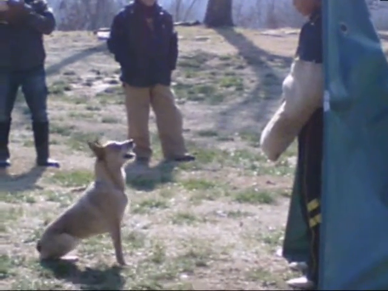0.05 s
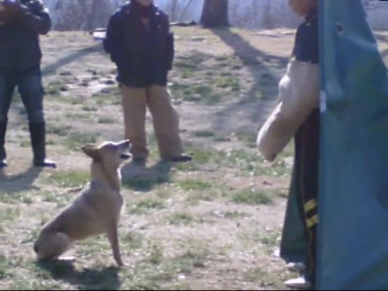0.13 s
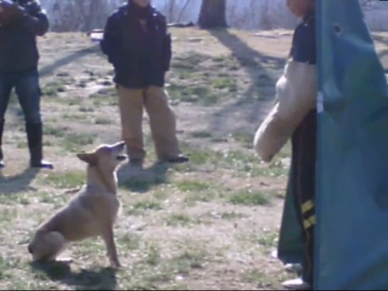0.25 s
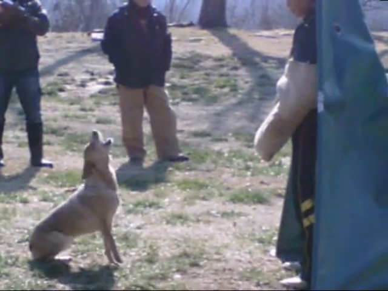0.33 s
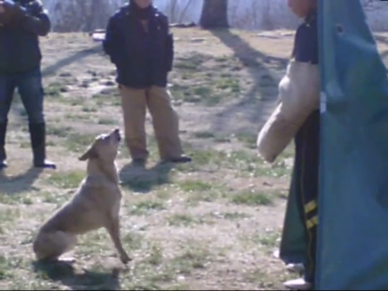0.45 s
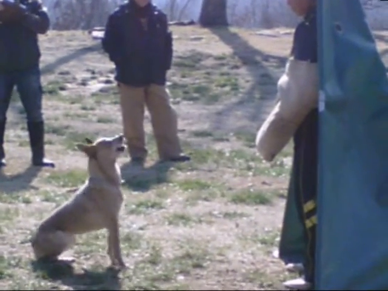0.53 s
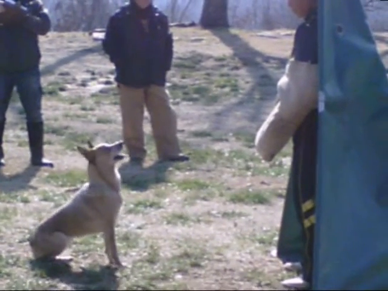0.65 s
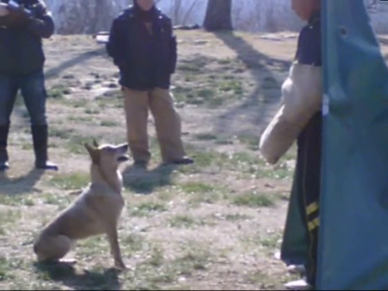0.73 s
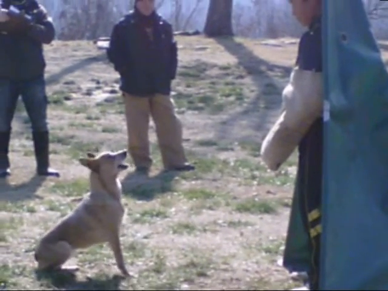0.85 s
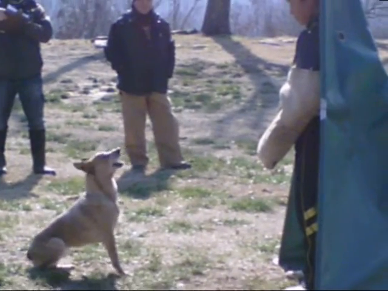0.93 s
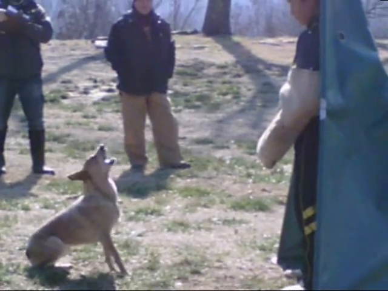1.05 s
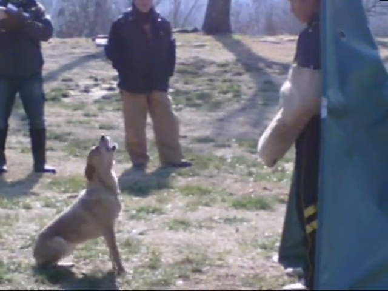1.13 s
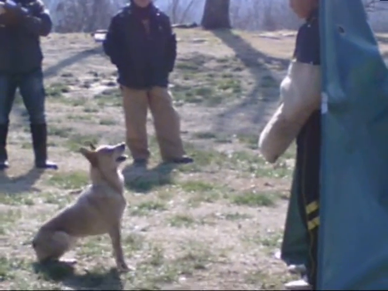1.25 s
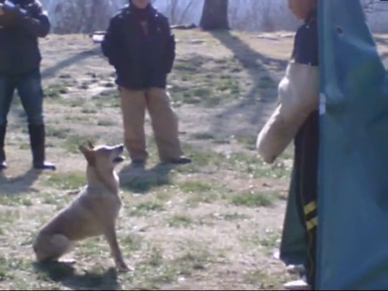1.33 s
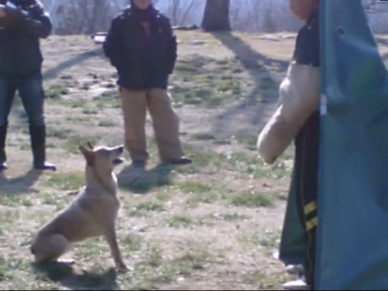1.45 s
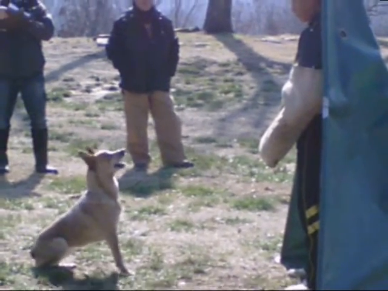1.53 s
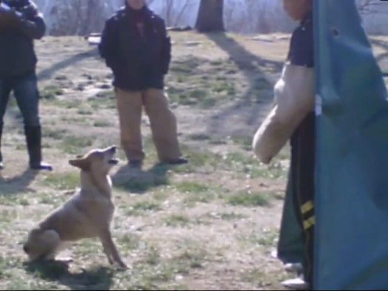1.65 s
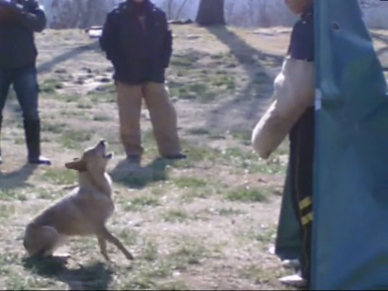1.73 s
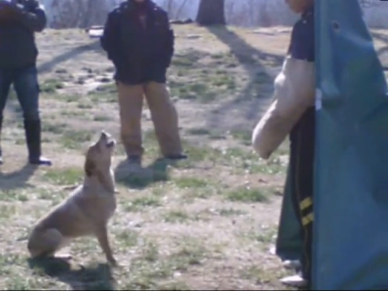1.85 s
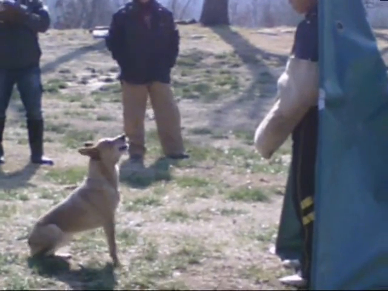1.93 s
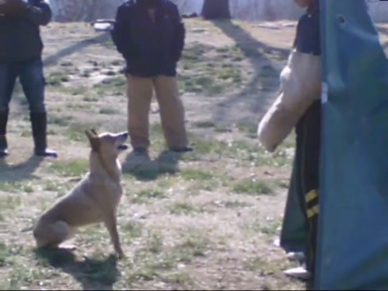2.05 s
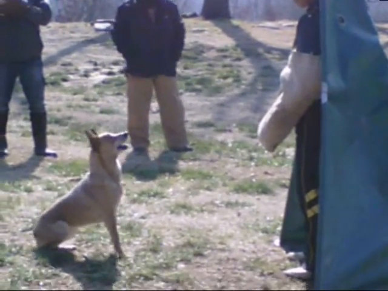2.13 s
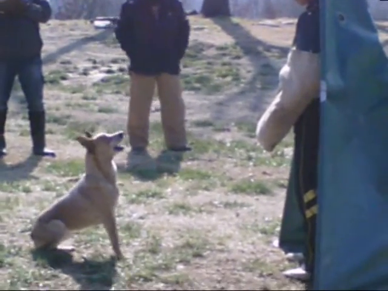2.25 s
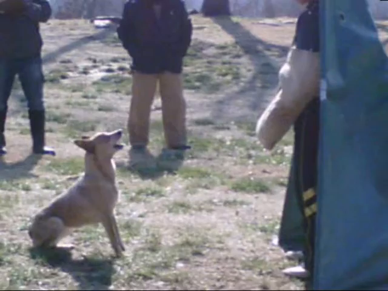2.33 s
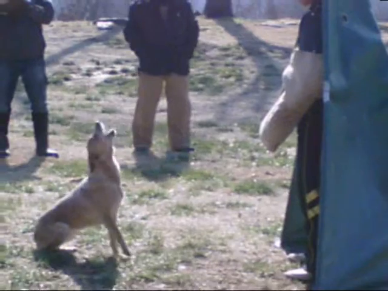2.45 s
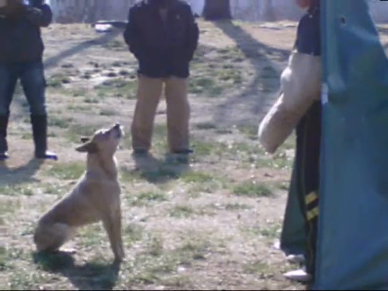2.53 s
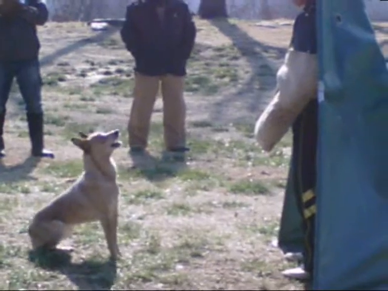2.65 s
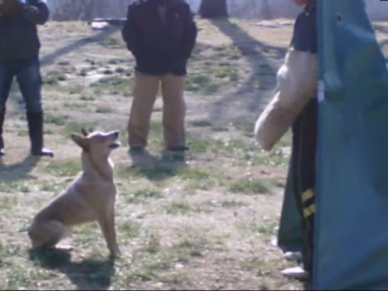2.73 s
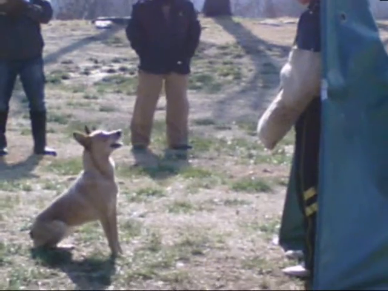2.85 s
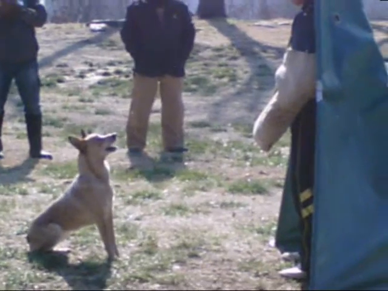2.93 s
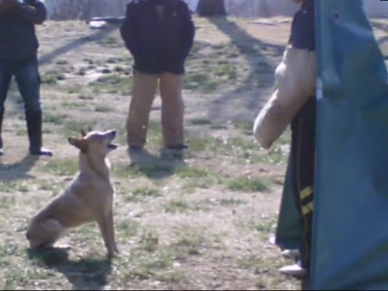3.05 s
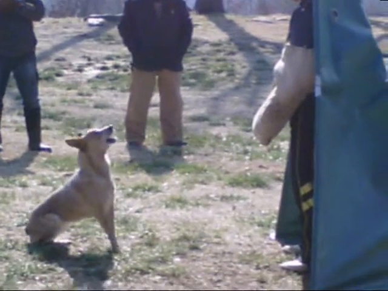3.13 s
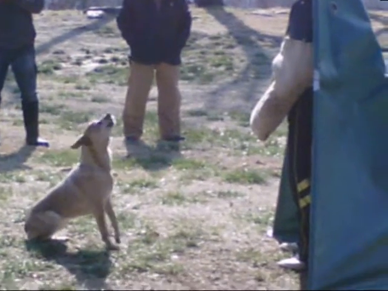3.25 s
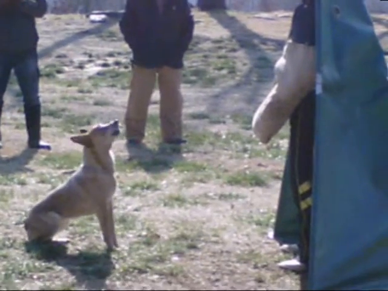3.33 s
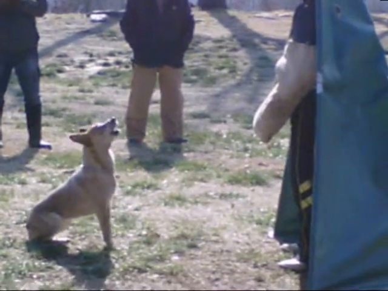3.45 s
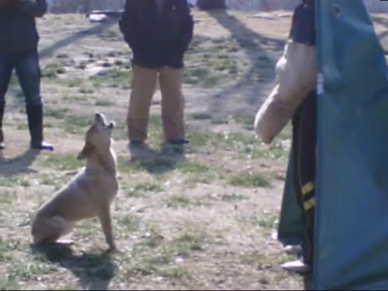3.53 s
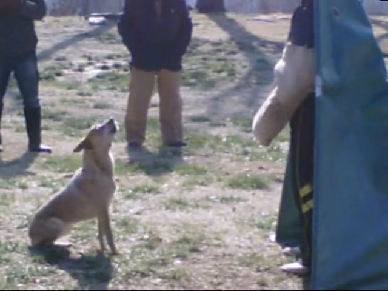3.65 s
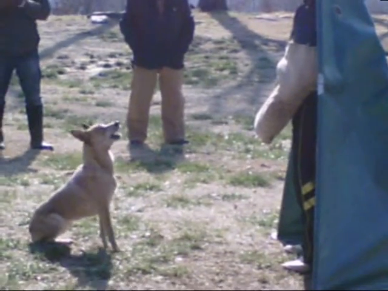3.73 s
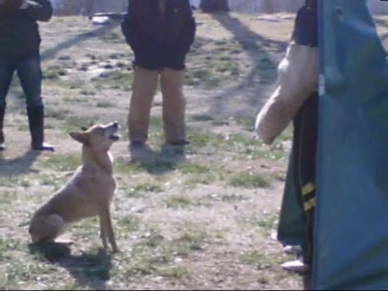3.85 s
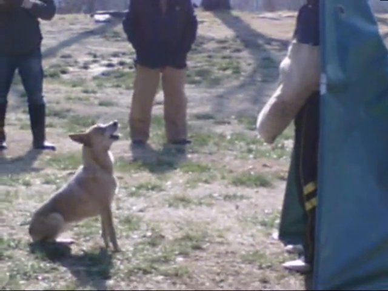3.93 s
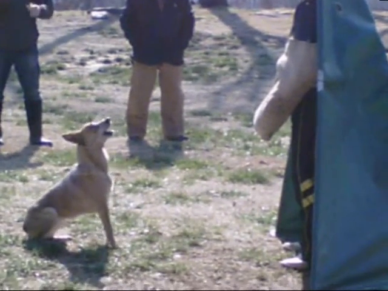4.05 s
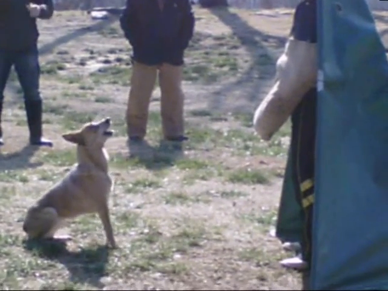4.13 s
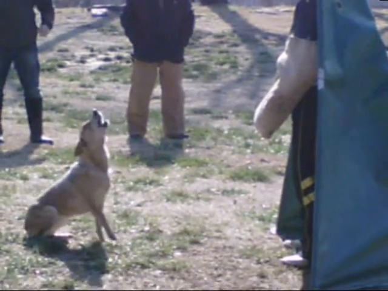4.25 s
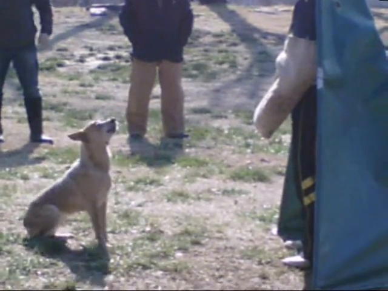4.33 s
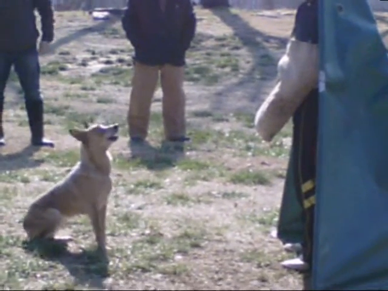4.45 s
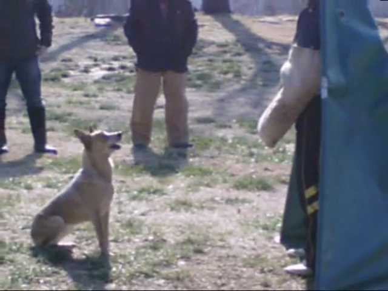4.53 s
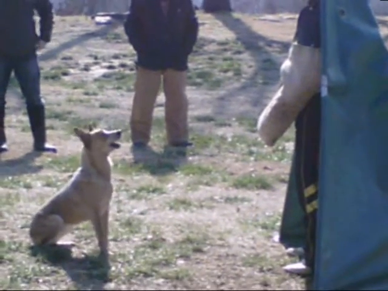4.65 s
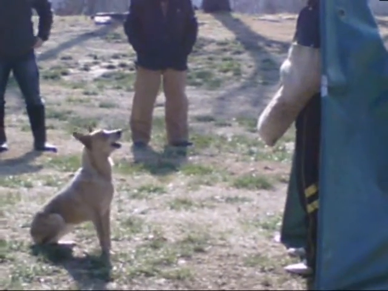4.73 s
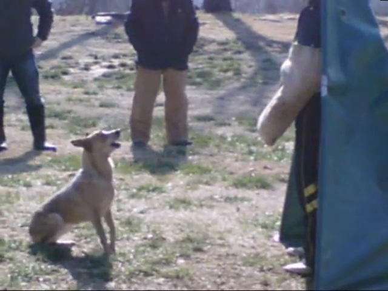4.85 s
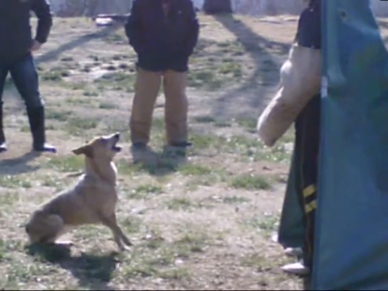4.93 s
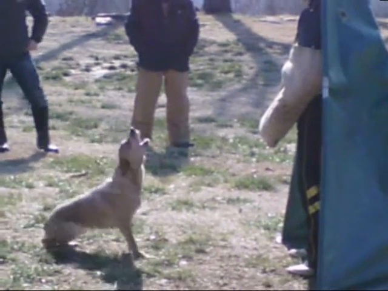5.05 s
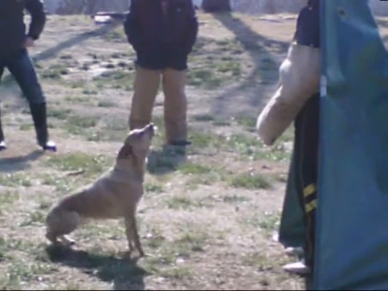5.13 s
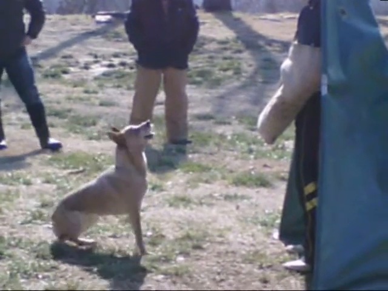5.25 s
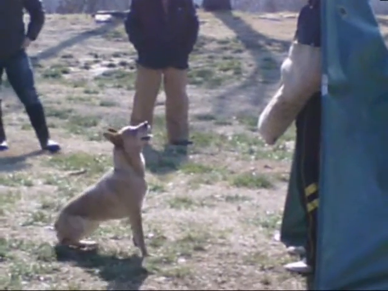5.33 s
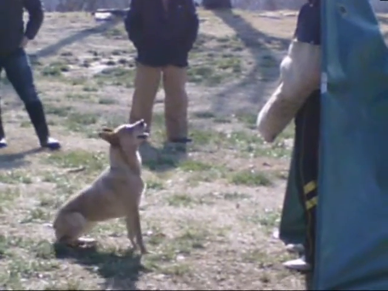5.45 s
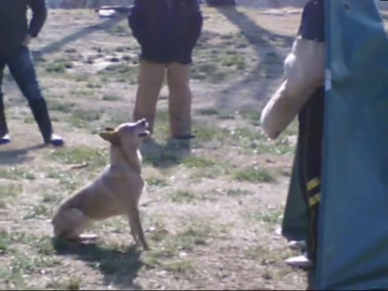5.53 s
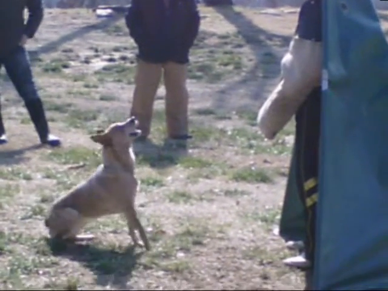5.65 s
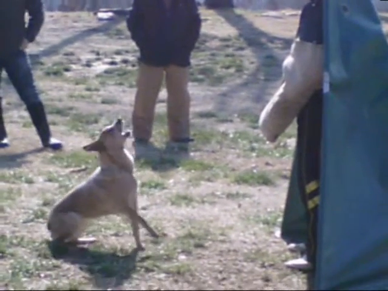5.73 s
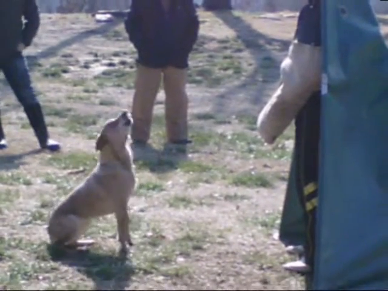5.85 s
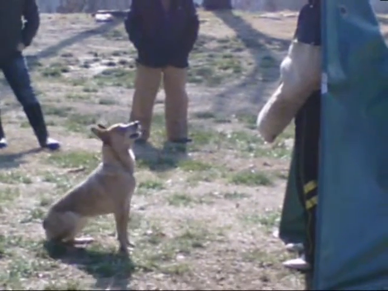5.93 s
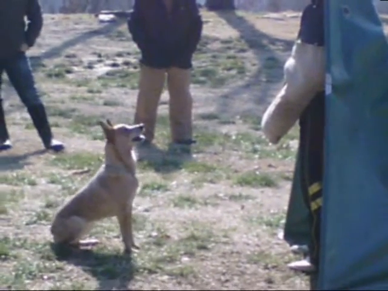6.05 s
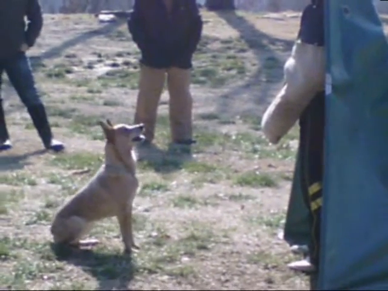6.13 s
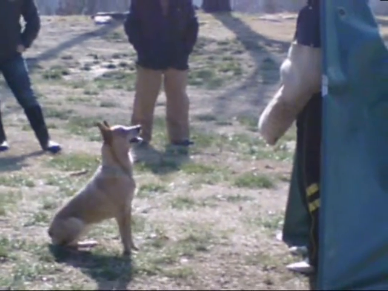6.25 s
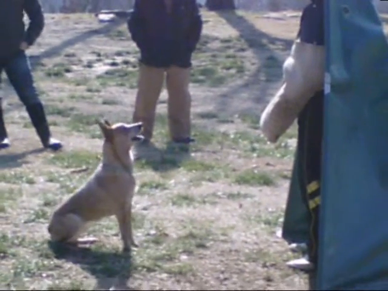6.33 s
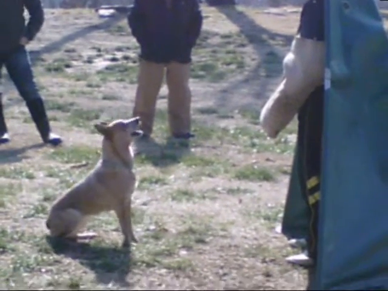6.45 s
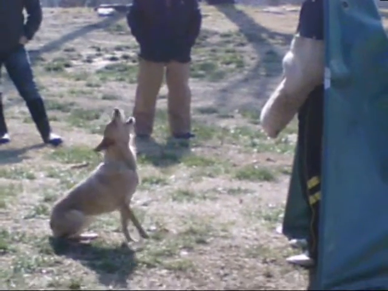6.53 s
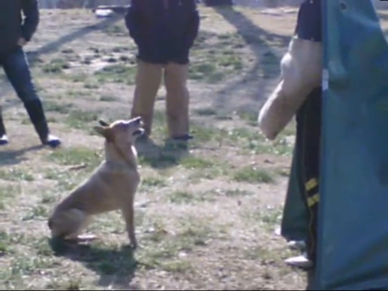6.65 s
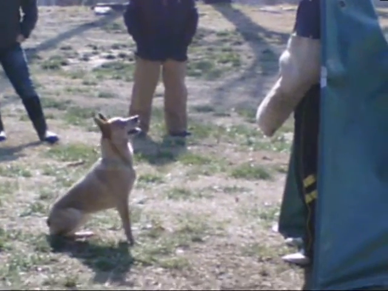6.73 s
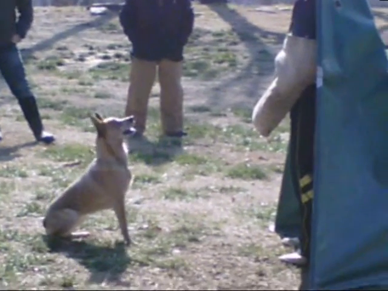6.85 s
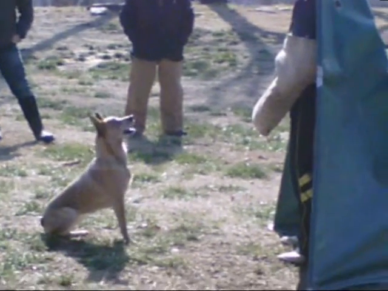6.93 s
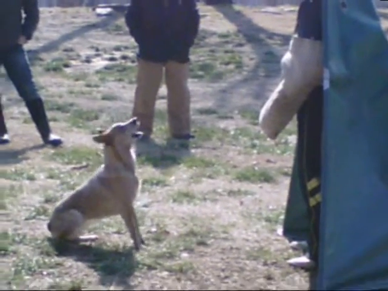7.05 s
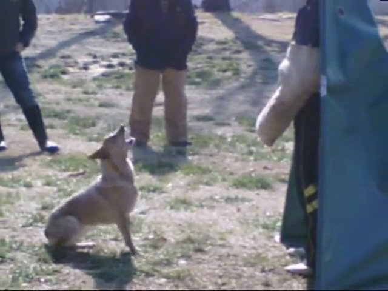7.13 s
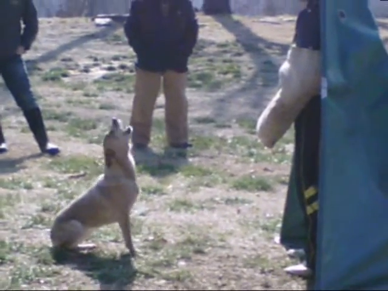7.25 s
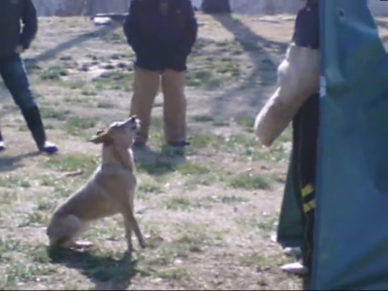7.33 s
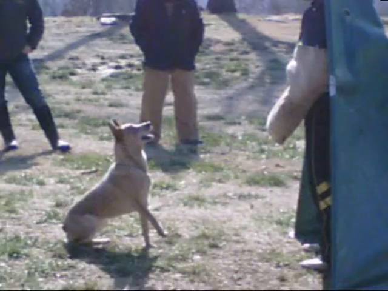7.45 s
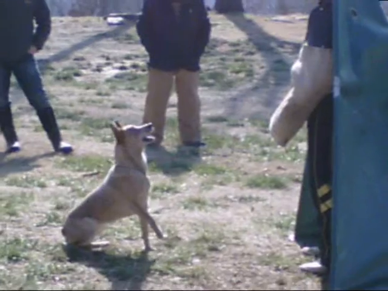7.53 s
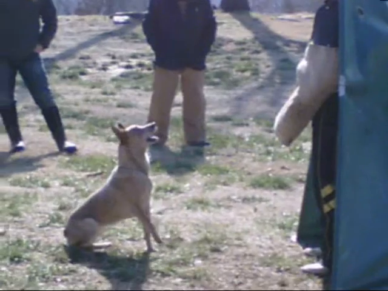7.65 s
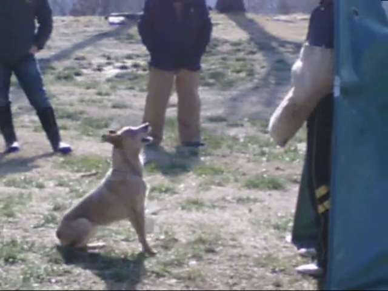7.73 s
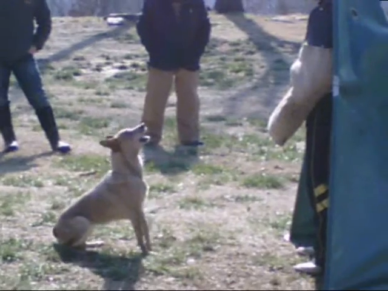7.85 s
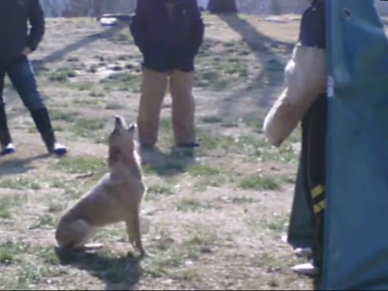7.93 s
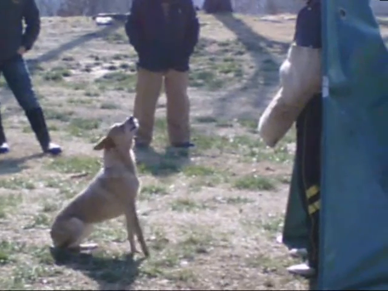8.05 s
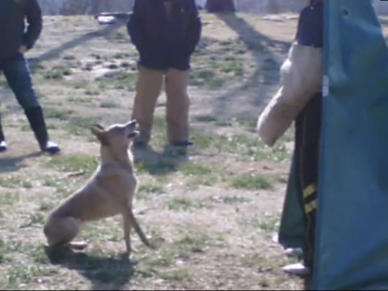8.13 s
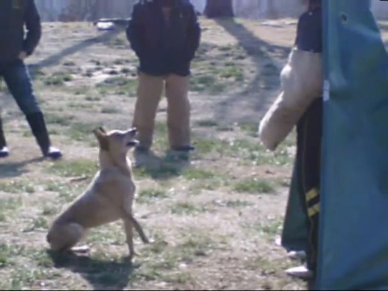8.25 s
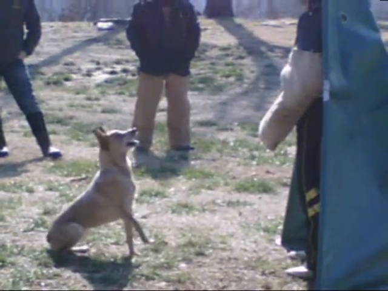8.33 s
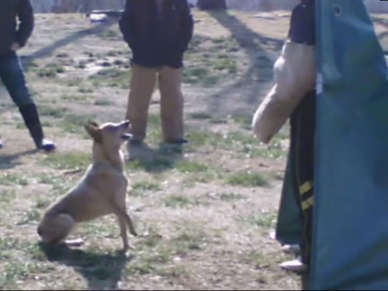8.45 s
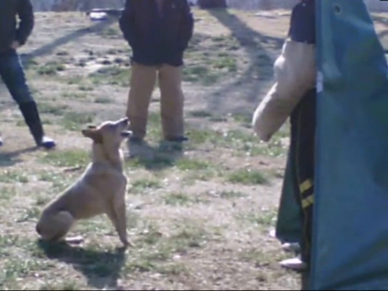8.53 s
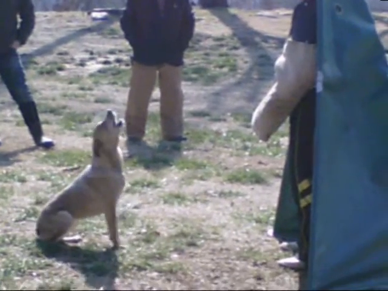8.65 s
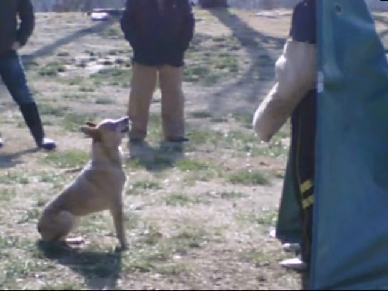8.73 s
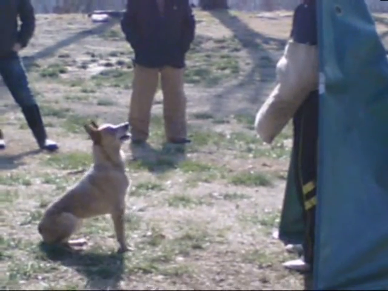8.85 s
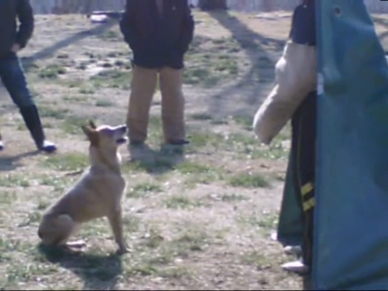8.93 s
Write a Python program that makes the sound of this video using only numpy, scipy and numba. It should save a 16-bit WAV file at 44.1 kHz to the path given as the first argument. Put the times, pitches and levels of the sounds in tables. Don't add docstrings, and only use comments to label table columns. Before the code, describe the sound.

Outdoors on an open grassy field, one medium dog a few metres from the microphone gives hoarse, short barks at a steady pace, about three every two seconds. Each bursts open and closes quickly, often with a tiny low hoot, then a dull echo from trees and walls. Between them are very quiet panting, grass rustle and wind rumble on the microphone. One jaw clap clicks around the middle of the first half.

```python
import sys
import numpy as np
from scipy import signal
from scipy.fft import rfft, irfft, next_fast_len
from scipy.io import wavfile
from scipy.ndimage import uniform_filter1d
from numba import njit

SR = 44100
rng = np.random.default_rng(int(sys.argv[2]) if len(sys.argv) > 2 else 0)


def ratio_of_db(decibels):
    return 10 ** (np.asarray(decibels, float) / 20)


def wav_out(sig):
    wavfile.write(sys.argv[1], SR, np.round(np.clip(np.atleast_2d(sig).T, -1, 1) * 32767).astype(np.int16))


N = 396018
RELEASE_S, FADE_S = 0.041, .04


def even(x, window_s):
    power = uniform_filter1d(x ** 2, int(window_s * SR)).clip(0)
    return x / np.sqrt(power + 1e-12)


def rms_one(x):
    return x / np.sqrt(np.mean(x ** 2) + 1e-20)


def in_time(rows):
    s, *columns = np.transpose(rows)
    return [np.interp(np.arange(N) / SR, s, c) for c in columns]


def coloured(x, spectrum):
    size = next_fast_len(len(x))
    hz = np.arange(size // 2 + 1) * SR / size + 1e-3
    at, db = np.transpose(spectrum)
    gain = ratio_of_db(np.interp(np.log(hz), np.log(at), db))
    return irfft(rfft(x, size) * gain, size)[:len(x)]


def noise():
    return rng.standard_normal(N)


def drift(rate):
    knots = rng.standard_normal(int(N / SR * 40) + 2)
    return np.interp(np.arange(N) / SR * rate, np.arange(len(knots)), knots)


def swells(rows, rest_db):
    t = np.arange(0, N + 64, 64) / SR
    level = ratio_of_db(rest_db) + sum(ratio_of_db(db) * np.exp(-((t - s) / half) ** 2) for s, half, db in rows)
    return np.interp(np.arange(N) / SR, t, 20 * np.log10(level))


def resonance(x, hz, width):
    r = np.exp(-np.pi * width / SR)
    poles = [1, -2 * r * np.cos(2 * np.pi * hz / SR), r * r]
    return signal.lfilter(np.array([1, 0, -1]) * (1 - r * r) / 2, poles, x)


def tract(x, modes, wider):
    out = 0
    for k, (hz, width, db) in enumerate(modes):
        out = out + (-1) ** k * ratio_of_db(db) * resonance(resonance(x, hz, width), hz, wider * width)
    return out


@njit
def gliding(x, hz, r):
    y = np.zeros(len(x))
    for i in range(2, len(x)):
        ringing = 2 * r * np.cos(2 * np.pi * hz[i] / SR) * y[i - 1] - r * r * y[i - 2]
        y[i] = (1 - r * r) / 2 * (x[i] - x[i - 2]) + ringing
    return y


def twice(x, hz, width):
    r = np.exp(-np.pi * width / SR)
    return gliding(gliding(x, hz, r), hz, r * r)


def ragged(x, modes, shift, patchy_db):
    return sum(ratio_of_db(db + patchy_db * drift(35)) * twice(x, hz * shift, width) for hz, width, db in modes)


def folds(rate_hz, jitter, spread_db, breath):
    gaps = SR / rate_hz * np.exp(jitter * rng.standard_normal(N // 20))
    sizes = ratio_of_db(spread_db * rng.standard_normal(N // 20))
    at = np.cumsum(gaps).astype(int)
    slaps = np.zeros(N)
    slaps[at[at < N]] = sizes[at < N]
    puffs = signal.lfilter([1], [1, -.98], slaps) * noise()
    return rms_one(rms_one(slaps) + breath * rms_one(puffs))


# (middle [s], half length [s], level [dB])
PANTS = [(0.0, .08, -69), (.24, .15, -73), (.9, .2, -71.5), (1.19, .07, -64), (1.85, .15, -68.5),
         (2.3, .15, -75), (2.9, .12, -68), (3.23, .1, -67.5), (4.4, .09, -66.5), (4.8, 0.061, -68),
         (4.97, 0.11, -65), (5.31, .12, -67), (5.93, .1, -71), (6.7, .1, -67), (7.2, .13, -67.5),
         (8.0, .12, -90), (8.3, .1, -82.5), (8.62, .1, -69), (8.98, .08, -79)]
# (frequency [Hz], width [Hz], level [dB])
PALATE = [(990, 206, -4.5)]
# (frequency [Hz], width [Hz], level [dB])
TONGUE = [(1850, 130, 0)]
# (frequency [Hz], width [Hz], level [dB])
RASP = [(4090, 130, 4), (5200, 160, 2), (5930, 240, -1), (6650, 260, -6), (7850, 260, -10),
        (8650, 340, -10), (9500, 300, -17), (13500, 700, -19), (15200, 400, -23)]


def panting():
    level_db = swells(PANTS, rest_db=-90)
    t = np.arange(N) / SR
    ends = np.array([-1] + [s + length + RELEASE_S + FADE_S / 2 for s, _, length, *_ in BARKS])
    since = t - ends[np.searchsorted(ends - .05, t) - 1] + 0.024
    third_hz = 3180 - 350 * np.exp(-since / .06)
    source = folds(rate_hz=36, jitter=.18, spread_db=3, breath=1.5)
    air = noise() * (.6 + 2 * np.exp(-since / .15))
    breath = source + air
    third = even(twice(breath, third_hz * ratio_of_db(.3 * drift(20)), width=260), .1)
    low = ratio_of_db(15.5) * even(tract(breath, PALATE, wider=1.1), 0.089)
    low = low + ratio_of_db(7.0) * even(tract(breath, TONGUE, wider=1.2), 0.12)
    high = ratio_of_db(-6) * even(tract(air, RASP[:6], wider=3), .1)
    sigh = ratio_of_db(-67) * np.exp(-((since - .03) / 0.044) ** 2) * np.clip(since / 0.034 + 3.0, 0, 1)
    sigh = sigh * ratio_of_db(3.0 * drift(25)) * even(twice(air, (third_hz + 3100) / 2, width=220), .05)
    return sigh + ratio_of_db(level_db - 9.0) * (third + low + high)


# (middle [s], half length [s], level [dB])
STEPS = [(.1, 0.47, -68.5), (.98, .15, -82.5), (1.33, 0.11, -79), (1.9, 0.21, -85), (2.45, 0.22, -74),
         (2.98, .25, -64.5), (3.55, 0.085, -81), (4.97, 0.31, -74), (5.7, 0.34, -86), (6.9, 0.12, -83),
         (8.0, 0.26, -96), (8.6, 0.23, -74)]
# (frequency [Hz], level [dB per Hz])
RUSTLE = [(700, 3), (1500, 12), (2400, -6), (3500, -13), (5000, -14.5), (8000, -25), (12000, -46)]


def grass():
    rustle_db = swells(STEPS, rest_db=-93.5)
    grains = noise() * ratio_of_db(2.5 * rng.exponential(1, N).clip(0, 5))
    return ratio_of_db(rustle_db + 6.0) * rms_one(coloured(grains, RUSTLE))


# (frequency [Hz], level [dB per Hz])
FIELD = [(200, -19), (400, -28), (620, -8.5), (800, 5), (1000, 4.5), (1470, -11.5), (1700, -14),
         (2300, -25.5), (3050, -14.5), (3700, -26.5), (6000, -24.5), (9300, -28), (11000, -34.5),
         (15500, -34)]


def field():
    return ratio_of_db(-62.5 + 1.5 * drift(6)) * rms_one(coloured(noise(), FIELD))


# (frequency [Hz], level [dB per Hz])
EARLIER_ECHO = [(400, -44), (700, 3.5), (1000, -1.5), (1500, 2.5), (1800, -17.5), (3000, -32),
                (5000, -80.5)]


def earlier_echo():
    dying = ratio_of_db(-45) * np.exp(-np.arange(N) / SR / 0.1)
    return dying * rms_one(coloured(noise(), EARLIER_ECHO))


# (middle [s], half length [s], level [dB])
WIND = [(.35, 0.25, -64.5), (1.02, 0.11, -58.5), (1.3, 0.05, -64.5), (1.78, 0.15, -62.5), (2.3, 0.19, -69),
        (2.55, .15, -60.5), (2.97, 0.26, -65), (3.3, 0.087, -57), (4.22, 0.22, -63.5), (4.97, 0.16, -56),
        (5.8, 0.2, -65), (6.5, .25, -76.5), (7.2, 0.11, -59.5), (7.9, 0.25, -67.5), (8.33, 0.1, -71),
        (8.62, 0.13, -57)]
# (frequency [Hz], level [dB per Hz])
RUMBLE = [(12, 11), (25, -20.5), (40, -3), (60, 1.5), (110, -12.5), (200, -20), (400, -50.5), (2000, -100)]
# (frequency [Hz], level [dB per Hz])
GUST = [(60, 3), (130, -1), (250, -7.5), (450, -8), (800, -23), (1500, -42), (4000, -100)]


def wind():
    gust_db = swells(WIND, rest_db=-71)
    strength_db = gust_db - gust_db.mean()
    buffet_db = -42 + 0.44 * strength_db + 1.6 * drift(4)
    rumble_db = -57.5 + .4 * strength_db + 1.5 * drift(2.9)
    flutter_db = 1.5 * drift(14)
    band = signal.butter(2, [2.5, 13], "band", fs=SR, output="sos")
    buffet = even(signal.sosfilt(band, noise()), 0.16)
    rumble = rms_one(coloured(noise(), [(5, -40), *RUMBLE]))
    gust = rms_one(coloured(noise(), GUST))
    return ratio_of_db(buffet_db) * buffet + ratio_of_db(rumble_db + 2.0) * rumble + ratio_of_db(gust_db + 7.0 + flutter_db) * gust


# (frequency [Hz], level [dB])
LEAKS = [(9006, -100), (9598, -101), (12452, -106), (13044, -106)]


def electronics():
    t = np.arange(N) / SR
    start_s, period_s, on_s = .0295, .08049, .046
    is_on = (t - start_s) % period_s < on_s
    gate = uniform_filter1d(1. * is_on, size=60)
    hum = (120, -64)
    steady = sum(ratio_of_db(db) * np.sin(2 * np.pi * hz * t) for hz, db in [*LEAKS, hum])
    return ratio_of_db(-73.5) * gate * np.sin(2 * np.pi * 6160 * t) + steady


# (onset [s], rise to peak [s], length until jaw closes [s], peak [dB], level at closing [dB])
BARKS = [(0.42, 0.061, 0.11, -16, -22), (1.114, 0.041, 0.11, -16.5, -22), (1.844, 0.037, 0.095, -17, -25),
         (2.513, 0.027, 0.11, -20.5, -19.5), (3.247, 0.045, 0.096, -16.5, -21),
         (3.544, 0.059, 0.12, -21.5, -22), (4.257, 0.065, 0.11, -18, -20),
         (5.106, .031, 0.084, -15.5, -23.5), (5.832, 0.055, 0.11, -19, -21.5),
         (6.548, 0.055, .12, -18, -20), (7.252, 0.036, 0.095, -17.5, -24), (7.982, 0.065, 0.11, -17.5, -23),
         (8.682, 0.052, .108, -17, -21.5)]
# (throat [dB], widest mouth resonance [Hz], third resonance [dB])
VOWELS = [(-21, 1240, -44), (-22.5, 1273, -44.5), (-23.5, 1326, -51.5), (-24, 1263, -49.5),
          (-24.5, 1170, -46), (-27.5, 1330, -49.5), (-26, 1330, -45.5), (-21.5, 1385, -45.5),
          (-24.5, 1284, -50.5), (-22, 1288, -43.5), (-24.5, 1387, -43.5), (-25.5, 1345, -54),
          (-23, 1264, -42)]


def effort():
    onset_db, faded_db = -42, -55
    shut_hz, closing_hz = 1047, 1200
    mouth, throat, third = [], [], []
    for (s, rise, length, peak_db, closing_db), (open_throat_db, wide_hz, third_db) in zip(BARKS, VOWELS):
        peak, shut = s + rise, s + length
        burst = s + min(0.021, rise - .01)
        done = shut + RELEASE_S
        gone = shut + RELEASE_S + FADE_S
        before, after = (s - .014, -75), (gone + .04, -72)
        burst_db = peak_db - 2 - 123.5 * (peak - burst)
        peak_hz = shut_hz + (wide_hz - shut_hz) * (peak - burst) / (shut - burst)
        mouth += [(*before, shut_hz), (s, onset_db, shut_hz), (burst, burst_db, shut_hz),
                  (peak, peak_db, peak_hz), (shut, closing_db, wide_hz), (done, -42, closing_hz),
                  (gone, faded_db, shut_hz), (*after, shut_hz)]
        throat += [before, (s, onset_db + 3), (burst, open_throat_db),
                   (burst + 0.018, open_throat_db - 3.0), (shut, open_throat_db - 12),
                   (done, -43), (gone, faded_db), after]
        third += [(s - .012, -105, 0), (s, onset_db - 26.5, 0), (burst, third_db, 0),
                  (burst + .04, -57, 0), (shut - .015, -52, .15), (shut + 0.03, -64.5, 1),
                  (done + 0.0071, -80, 1), (gone + 0.048, -92, 0)]
    mouth_db, mouth_hz = in_time(mouth)
    throat_db, = in_time(throat)
    third_db, closed = in_time(third)
    loudest_db = np.maximum(mouth_db, throat_db + 3.5)
    rasp_db = -58 + 0.83 * (np.maximum(loudest_db, faded_db) + 17.5)
    rasp_db = rasp_db + np.minimum(mouth_db - faded_db, 0)
    return mouth_db, mouth_hz, throat_db - mouth_db, third_db - mouth_db, rasp_db - mouth_db, closed


# (frequency [Hz], width [Hz], level [dB])
THROAT = [(280, 300, -23), (505, 55, -13), (750, 70, 0)]
# (frequency [Hz], width [Hz], level [dB])
THIRD = [(2950, 160, -1), (3250, 150, 0)]


def barks():
    mouth_db, mouth_hz, throat_db, third_db, rasp_db, closed = effort()
    source = folds(rate_hz=360, jitter=.3, spread_db=2, breath=.7)
    opening = np.clip((mouth_db + 40.5) / 22, 0, 1)
    narrow, wide = np.exp(-np.pi * 80 / SR), np.exp(-np.pi * 500 / SR)
    arch_hz = mouth_hz * (0.89 + 0.23 * opening) * (1 + .04 * drift(36))
    mouth = gliding(gliding(source, arch_hz, narrow), arch_hz, wide) * ratio_of_db(3.0 * drift(38))
    mouth = mouth + tract(source, PALATE, wider=1.96)
    edge = signal.butter(6, 1612, fs=SR, output="sos")
    voice = even(signal.sosfilt(edge, mouth), 0.017)
    throat = even(signal.sosfilt(edge, tract(source, THROAT, wider=2.43)), 0.021)
    voice = voice + ratio_of_db(throat_db + 1.0) * throat
    fading_db = np.minimum(throat_db, 0)
    tongue = even(twice(source, 1904.5 + 14 * fading_db, width=90), .02)
    voice = voice + ratio_of_db(1.5 * fading_db - 21 + 8 * opening) * tongue
    hiss = source + 0.47 * noise()
    third = ragged(hiss, THIRD, 1 - .13 * closed, patchy_db=5)
    voice = voice + ratio_of_db(third_db) * even(third, .02)
    rasp = ragged(hiss, RASP, .98 + .02 * opening - .015 * closed, patchy_db=4)
    voice = voice + ratio_of_db(rasp_db) * even(rasp, .02)
    return ratio_of_db(mouth_db) * voice


# (frequency [Hz], level [dB])
ECHO_COLOUR = [(200, -28), (450, -7.5), (620, 10), (800, -10.5), (1050, 4), (1300, -4.5), (1600, 0.5),
               (2200, -9), (3200, -14.5), (4500, -0.5), (8000, -9), (12000, -31.5)]
# (delay [s], level [dB])
ECHOES = [
    (.075, -20.5),
    (.165, -32),
    (.3, -56.5),
]


def surroundings(x):
    t = np.arange(int(1.5 * SR)) / SR
    shape = ratio_of_db(-60.5 - 64.3 * t) + ratio_of_db(-68.0 - 23.2 * t)
    shape = shape * np.clip(t / 0.11, 0, 1)
    for delay, db in ECHOES:
        shape = shape + ratio_of_db(db - 40.5) * np.exp(-((t - delay) / 0.043) ** 2)
    reply = coloured(shape * rng.standard_normal(len(t)), ECHO_COLOUR)
    return signal.fftconvolve(x, reply)[:N]


# (time [s], peak [dB], pitch [Hz])
HOOTS = [(0.579, -40, 507), (1.267, -43.5, 500), (1.988, -33, 517), (2.641, -28.5, 503),
         (3.401, -31.5, 479), (3.693, -27.5, 492), (4.408, -38, 478), (5.98, -33.5, 496),
         (6.686, -30.5, 514), (7.397, -43, 524), (8.131, -34.5, 500), (8.837, -36, 508)]


def hoots():
    out = np.zeros(N)
    t = np.arange(int(.07 * SR)) / SR - .02
    slides = rng.uniform(.3, 2.2, len(HOOTS))
    for (s, db, hz), slide in zip(HOOTS, slides):
        i = int((s - .02) * SR)
        turns = hz * (t - slide * (t - .008) ** 2)
        swell = np.exp(-((t - .008) / 0.0089) ** 2)
        out[i:i + len(t)] += ratio_of_db(db) * swell * np.sin(2 * np.pi * turns)
    return out * ratio_of_db(0.73 * drift(40))


# (time [s], peak [dB], frequency [Hz],
# width [Hz])
TICKS = [(0.835, -50, 7000, 7900), (0.907, -54, 900, 900), (0.9644, -70, 6000, 1500),
         (0.9745, -61, 4200, 400), (1.008, -56, 3000, 700), (1.039, -40, 1100, 700),
         (1.0385, -64, 3000, 506), (1.588, -56, 8300, 2530), (3.226, -53, 3500, 2000),
         (3.309, -40, 2530, 4000), (4.609, -56, 2700, 1600), (5.04, -60, 4500, 2520),
         (5.153, -26, 1500, 1470), (5.57, -62, 3020, 199), (5.764, -60, 1200, 1200),
         (7.316, -26, 1390, 894)]
# (time [s], peak [dB], frequency [Hz], width [Hz])
SNAPS = [
    (3.3065, -9, 1150, 700),
]


def ticks():
    out = np.zeros(N)
    soft_contact = np.hanning(int(.0007 * SR))
    for rows, contact in (TICKS, [1.]), (SNAPS, soft_contact):
        for s, db, hz, width in rows:
            click = np.zeros(int(.01 * SR))
            click[:len(contact)] = contact
            click = tract(click, [(hz, width, 0)], wider=1.5)
            i = int(s * SR)
            out[i:i + len(click)] += ratio_of_db(db) * click / np.abs(click).max()
    return out


def scene():
    background = grass() + field() + earlier_echo() + wind() + electronics()
    dog = barks() + hoots()
    return (panting() + background + dog + surroundings(dog) + ticks())[None]


def roll_off(x):
    return signal.sosfilt(signal.butter(12, 15750, fs=SR, output="sos"), x)


def record(dry):
    mix = dry - .0047
    return roll_off(mix)


dry = scene()
out = record(dry)
wav_out(out)
```